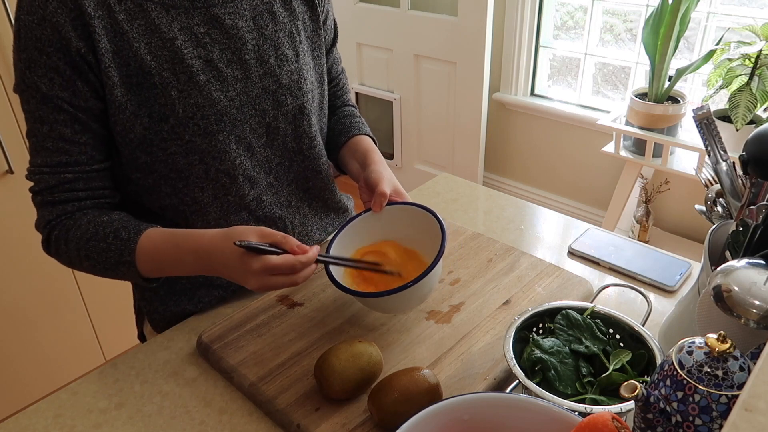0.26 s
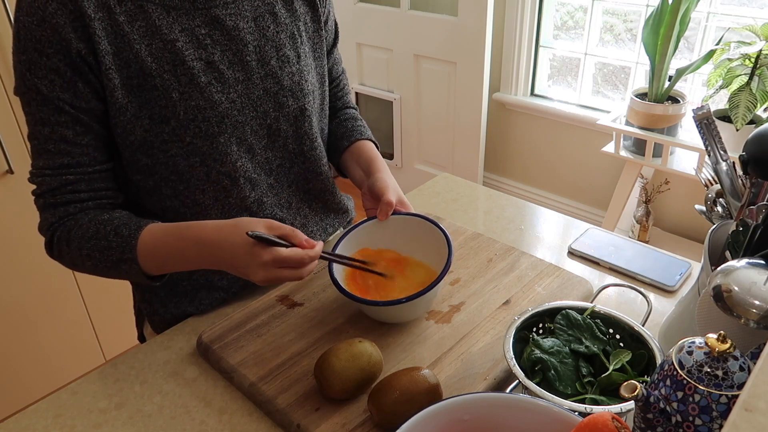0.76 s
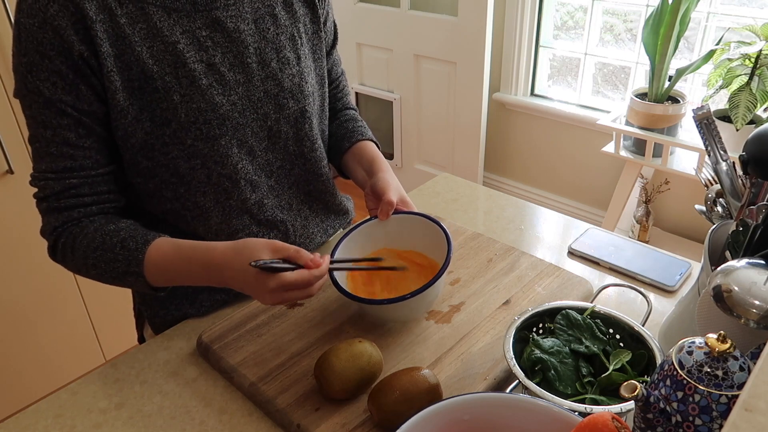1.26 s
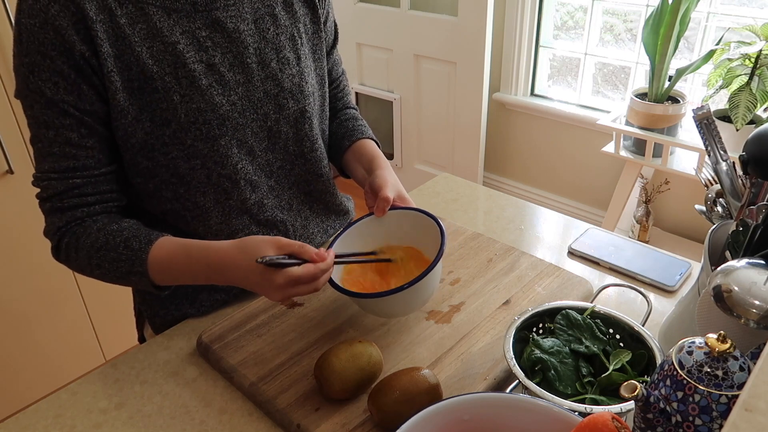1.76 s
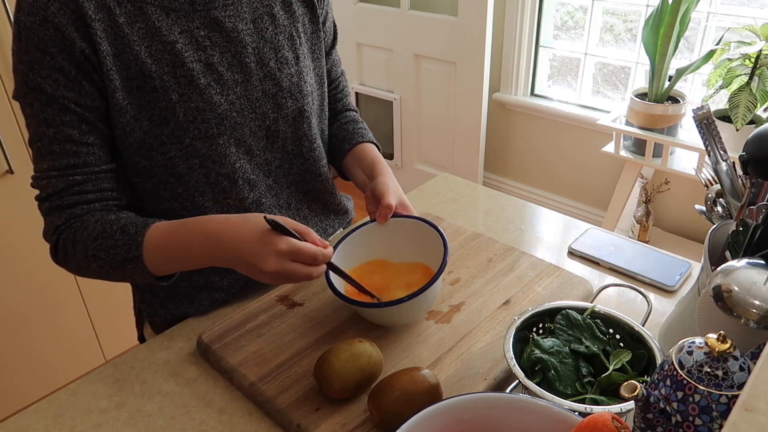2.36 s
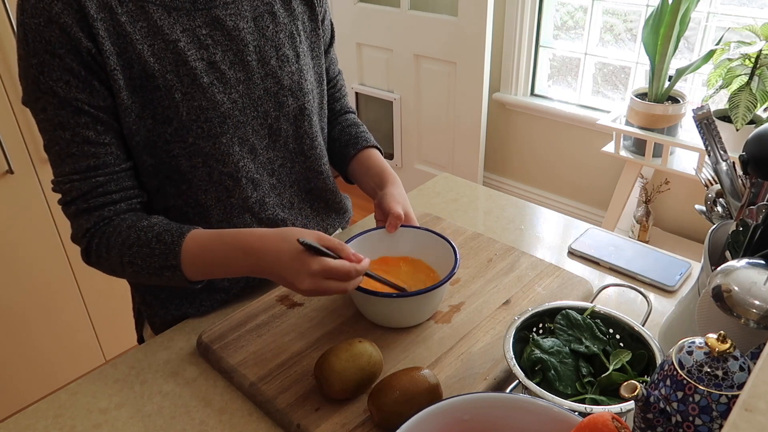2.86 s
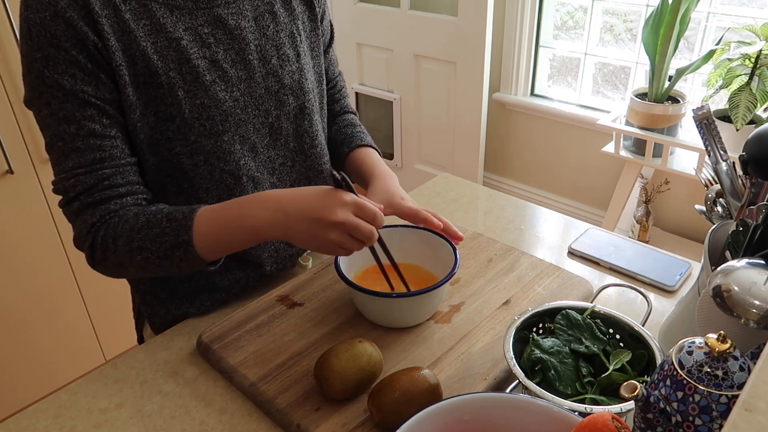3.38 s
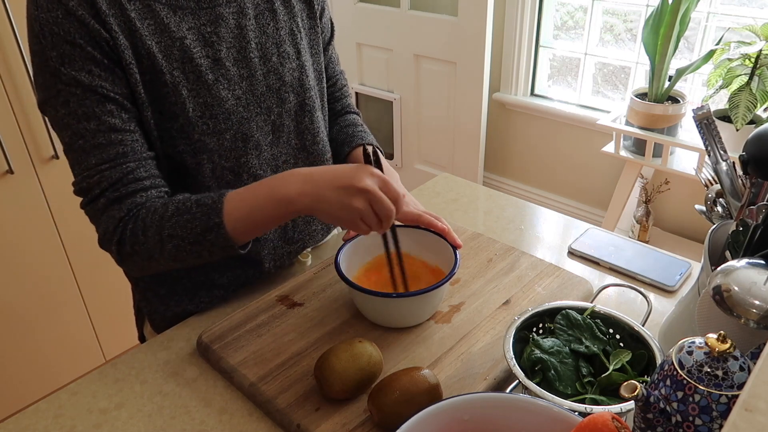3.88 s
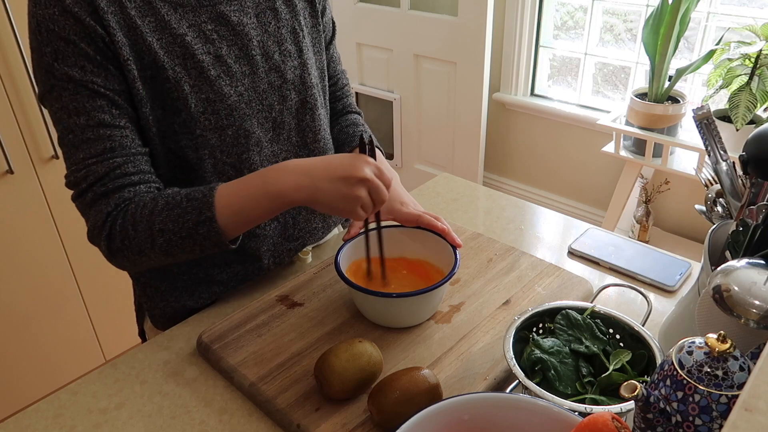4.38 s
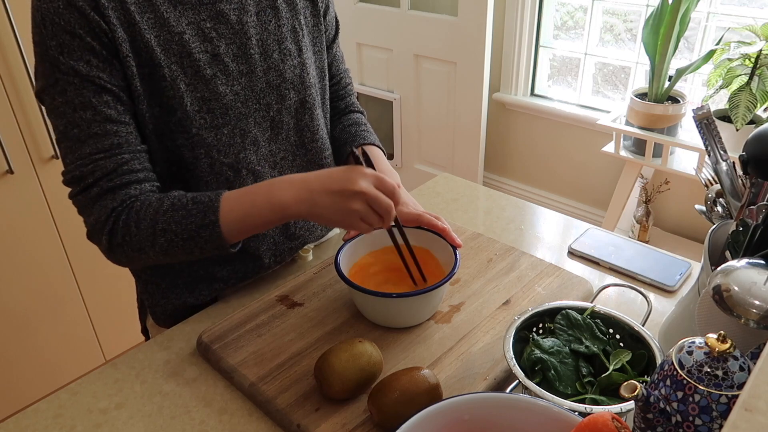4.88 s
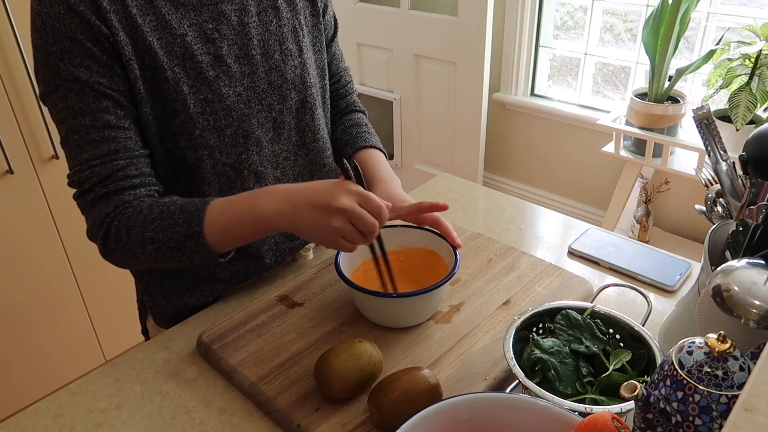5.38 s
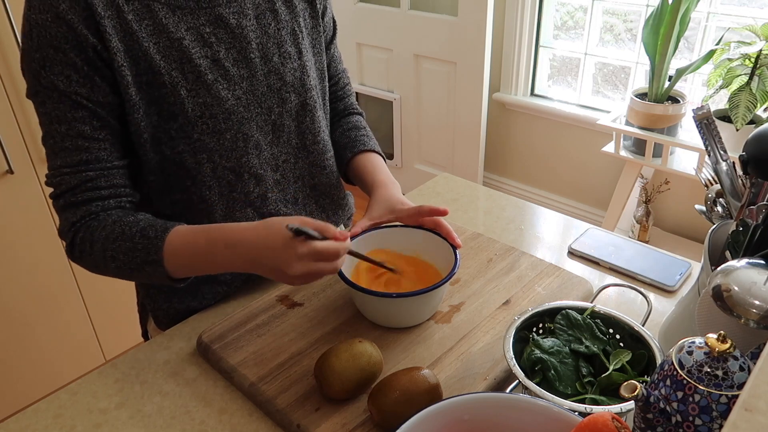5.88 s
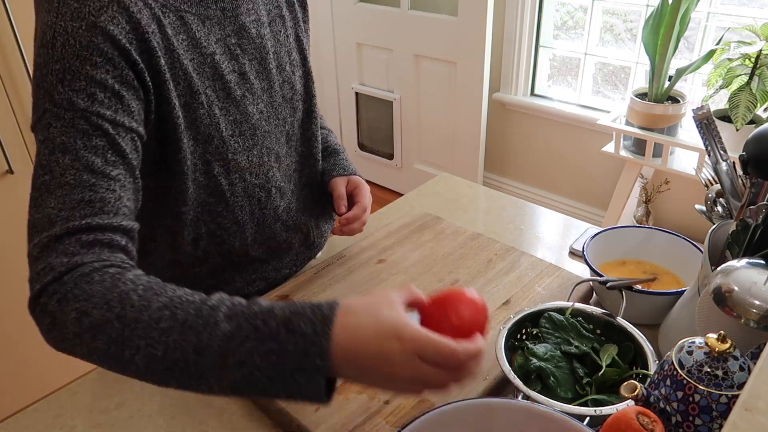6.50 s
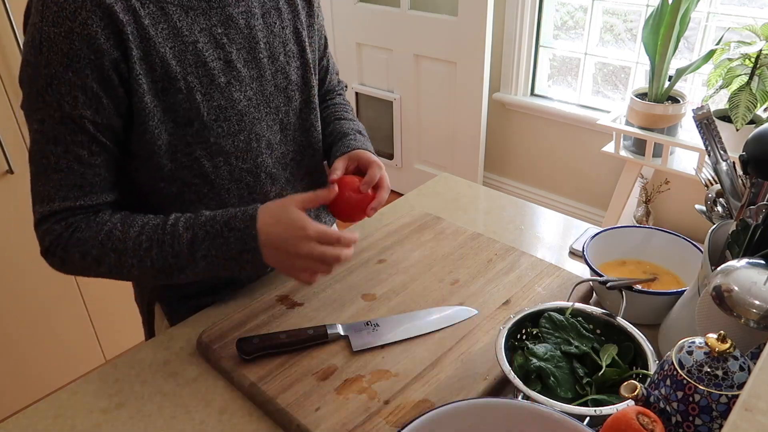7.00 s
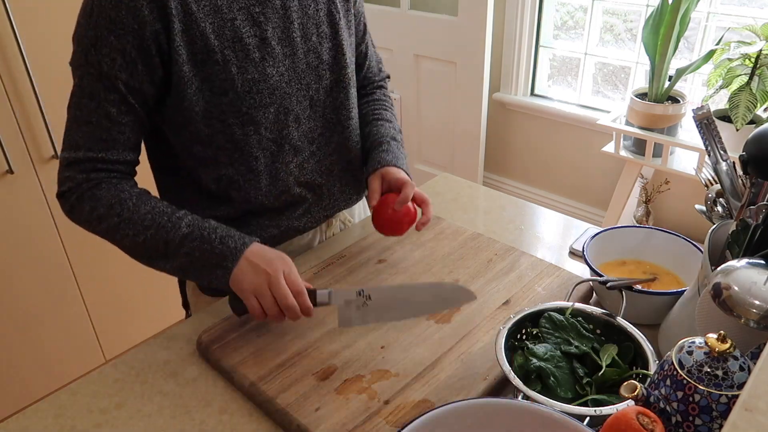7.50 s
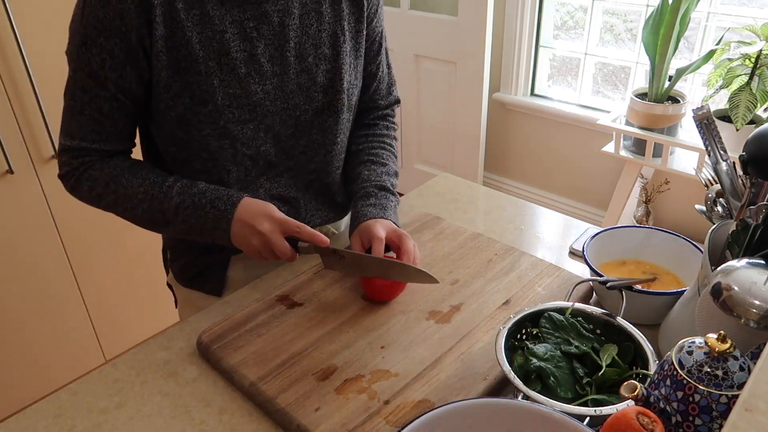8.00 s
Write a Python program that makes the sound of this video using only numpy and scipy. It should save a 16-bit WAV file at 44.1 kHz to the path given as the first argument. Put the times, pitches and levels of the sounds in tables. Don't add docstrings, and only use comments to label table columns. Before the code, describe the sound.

Close stereo pickup of egg beating in a small reverberant kitchen over a low appliance drone. Quick uneven stick clicks and liquid plops come first, then two strong hollow bowl knocks on a board, a smoother wet scraping stir, and bright closing taps. The sound cuts abruptly to near quiet: cloth rustles, a knife lightly bumps wood, and its blade draws softly through a tomato.

```python
import sys
import numpy as np
from scipy import signal
from scipy.fft import rfft, irfft, next_fast_len
from scipy.io import wavfile
from scipy.ndimage import map_coordinates

SR = 44100
rng = np.random.default_rng(int(sys.argv[2]) if len(sys.argv) > 2 else 0)


def attenuation_scalar(level_db):
    decades = np.asarray(level_db, float) / 20
    return 10 ** decades


def master_out(mix):
    frames = np.transpose(np.atleast_2d(mix))
    ceiling = np.clip(frames, -1, 1)
    pcm = np.round(ceiling * 32767).astype(np.int16)
    wavfile.write(sys.argv[1], SR, pcm)


N = 363825
SCENE_CHANGE_S = 6.181

# frequency in Hz, width in Hz, level in dB.
BOWL_MODES = [(962, 210, -3.5), (1130, 250, -7), (1390, 240, -11.5), (1662, 310, -4), (1790, 148, 0.5),
              (2030, 185, -1.5), (2234, 410, -6.5), (2700, 300, -7), (3061, 180, -4), (3566, 240, -15.5),
              (4200, 630, -17.5), (5460, 1320, -18), (5870, 1370, -18), (7880, 760, -34)]
# frequency in Hz, correlation -1 to 1.
COUNTER_LIKENESS = [(60, 0.99), (150, 1), (380, 1), (950, 0.98), (2380, 1), (5980, 0.36), (15000, -0.26)]


def unit(x):
    return x / np.sqrt(np.mean(x ** 2) + 1e-20)


def peak(x):
    return x / np.abs(x).max()


def along(points, hz):
    f, v = np.transpose(points)
    return np.interp(np.log(hz + 1), np.log(f + 1), v)


def curves(rows):
    t = np.arange(0, N / SR + .01, .002)
    power = 0
    for s, db, rise_s, fall_s in rows:
        distance = np.where(t < s, (s - t) / rise_s, (t - s) / fall_s)
        power = power + attenuation_scalar(db - 8.6 * distance) ** 2
    return np.interp(np.arange(N) / SR, t, np.sqrt(power))


def wobble(rate_hz):
    knots = rng.standard_normal(int(N * rate_hz / SR) + 4)
    return map_coordinates(knots, [np.arange(N) * rate_hz / SR])


def filtered(x, response):
    n = x.shape[-1]
    m = next_fast_len(n + min(n, 8192))
    return irfft(rfft(x, m) * response(np.fft.rfftfreq(m, 1 / SR)), m)[..., :n]


def resonant(modes):
    def response(f):
        total = 0
        for k, (hz, width_hz, db) in enumerate(modes):
            damping = 1j * f * width_hz
            total = total + (-1) ** k * attenuation_scalar(db) * damping / (hz * hz - f * f + damping)
        return total
    return response


def spread(pair, likeness):
    def mid_side(hz):
        angle = np.arccos(np.clip(along(likeness, hz), -1, 1)) / 2
        return np.array([np.cos(angle), np.sin(angle)])
    mid, side = filtered(pair, mid_side)
    return np.array([mid + side, mid - side])


def ring(t, hz, t60_s, attack_s=0.00021):
    return np.sin(2 * np.pi * hz * t) * attenuation_scalar(-60 * t / t60_s) * (1 - np.exp(-t / attack_s))


def add(bus, s, sound):
    part = bus[..., round(s * SR):][..., :sound.shape[-1]]
    part += sound[..., :part.shape[-1]]


def spots(count):
    # frequency in Hz, t60 in s.
    decay = [(150, 0.72), (700, 0.51), (2000, 0.54), (4000, 0.49), (6000, 0.5), (12000, 0.22), (16000, .1)]
    # delay in s, level in dB.
    echoes = [(.003, -6.5), (.0055, -8), (.0075, -9.5), (.009, -10), (.012, -12.5), (0.017, -15),
              (.021, -8.5)]
    n = SR // 2
    hz, t, z = signal.stft(rng.standard_normal((count, 2, n)), SR, nperseg=256)
    z = z * attenuation_scalar(-60 * t / along(decay, hz)[:, None])
    tails = signal.istft(z, SR, nperseg=256)[1][..., :n]
    build_up = 1 - np.exp(-np.arange(n) / SR / 0.0022)
    tails = np.array([spread(tail * build_up, COUNTER_LIKENESS) for tail in tails])
    early = np.zeros_like(tails)
    early[..., 0] = 1
    for near in early:
        for delay_s, db in echoes:
            lean = rng.integers(-1, 2)
            at = round(delay_s * rng.uniform(.9, 1.1) * SR) + np.array([lean, -lean])
            near[[0, 1], at] += attenuation_scalar(db) * rng.choice([-1, 1])
    return list(zip(early, tails / np.linalg.norm(tails[:, :1], axis=2, keepdims=True)))


def heard(sound, spot, wet_db):
    early, tail = spot
    return signal.fftconvolve(sound[None], early + attenuation_scalar(wet_db) * tail, axes=1)


def contacts():
    # start in s, ring in dB, hollow tone in Hz, click over ring in dB.
    strikes = [(.086, -30, 1010, -4), (0.267, -34.5, 930, -4.5), (.44, -30.5, 1740, -4.5),
               (.554, -27, 1430, -10.5), (0.611, -26, 1930, -6), (.787, -23.5, 810, -9.5),
               (.946, -25.5, 1025, -8.5), (0.995, -32.5, 1370, -9), (1.116, -25, 1950, -5.5),
               (1.288, -29.5, 1790, -9.5), (1.451, -30, 1880, -7.5), (1.623, -27.5, 1850, -3.5),
               (1.794, -29, 1790, -4), (1.92, -32, 1370, -15), (2.01, -30.5, 1750, -3),
               (2.605, -27, 2690, -12.5), (2.622, -25.5, 2650, -12), (2.973, -37, 1720, -12.5),
               (3.04, -32, 1830, -8.5), (3.124, -27.5, 1490, -5), (3.322, -27, 1713, -8),
               (4.118, -34, 830, -38), (4.38, -35, 1690, -14), (4.568, -33, 2030, -17),
               (4.773, -32, 960, -18), (5, -29, 2030, -3.5), (5.408, -47.5, 940, -0.5),
               (5.621, -46, 2320, -14), (5.879, -25, 1960, -24), (6.0551, -21, 1900, -2)]
    # start in s, ring in dB, click over ring in dB.
    grazes = [(.001, -40.5, -26), (0.506, -41, -4), (0.907, -41.5, -9), (1.952, -33.5, 0.5),
              (2.119, -35.5, -3), (2.303, -37.5, -2.5), (2.786, -38.5, -13), (2.805, -33.5, -10),
              (5.215, -36, -2), (5.317, -35, -40), (5.433, -35.5, -13), (5.638, -33, 6), (5.843, -36, 9),
              (6.122, -40.5, -4)]
    # start in s, peak in dB, hollow tone in Hz, t60 in s.
    plops = [(0.05, -19, 1240, 0.0061), (.224, -22, 1220, 0.029), (0.508, -32, 1130, 0.016),
             (0.716, -40, 1390, .03), (1.077, -36, 2440, 0.028), (1.24, -16.5, 1360, 0.01),
             (2.229, -34, 1214, 0.032), (2.27, -24, 2590, 0.014), (2.303, -23, 3010, .01),
             (2.434, -16.5, 775, 0.036), (2.639, -25, 2570, 0.011), (3.052, -25.5, 1790, 0.034),
             (3.427, -31.5, 1880, 0.016), (3.502, -11, 870, 0.011), (3.588, -36, 1110, .03),
             (3.663, -27, 870, 0.014), (4.008, -18.5, 1800, 0.0089), (4.055, -31, 1750, .013),
             (4.329, -18, 2040, 0.011), (4.537, -19.5, 1920, 0.018), (5.186, -28, 1790, 0.025),
             (5.378, -30.5, 987, 0.039), (5.666, -20, 2010, 0.03), (6.026, -34, 2030, 0.017),
             (6.121, -27, 1910, 0.019)]
    # start in s, peak in dB, tone in Hz, click in dB.
    jolts = [
        (2.3428, -7, 770, -27.5),
        (2.4741, -1, 865, -50.5),
    ]
    touches = [(s, db, hz, 7, 0, click_db, 0.019) for s, db, hz, click_db in strikes]
    touches += [(s, db, 0, 0, 0, click_db, 1) for s, db, click_db in grazes]
    touches += [(s, db, hz, 0, -18, -34.5, t60_s) for s, db, hz, t60_s in plops]
    touches += [(s, db, hz, 0, -58, click_db, 0.0098) for s, db, hz, click_db in jolts]
    return sorted(touches)


def taps(bus, room):
    t = np.arange(SR // 12) / SR
    second_stick_s, second_stick_db = .0065, -4
    tick = attenuation_scalar(-60 * t / 0.009)
    tick = tick + attenuation_scalar(second_stick_db) * np.roll(tick, round(second_stick_s * SR))
    click = resonant([(5850, 3500, -3), (12800, 2600, 0), (15300, 1200, -16)])
    for k, (s, db, hz, tone_db, ring_db, click_db, t60_s) in enumerate(contacts()):
        tone = attenuation_scalar(tone_db) * ring(t, hz, np.clip(t60_s, .004, .2), 0.0003)
        force = 0.23 * rng.standard_normal(len(t)) * attenuation_scalar(-60 * t / 0.023)
        force[3] = 1
        held = []
        for mode_hz, width_hz, level_db in BOWL_MODES:
            cupped = mode_hz < 1300 and 2.55 < s < 3.2
            level_db = level_db + rng.normal(0, 2.6) - 10 * cupped
            held.append((mode_hz * rng.normal(1, 0.011), width_hz, level_db))
        bowl = attenuation_scalar(ring_db + 7.5) * peak(filtered(force, resonant(held)))
        snap = attenuation_scalar(click_db + 9.5) * peak(filtered(rng.standard_normal(len(t)) * tick, click))
        wet_db = .7 if tone_db or not hz else 0
        add(bus, s - .0005, heard(attenuation_scalar(db - 4) * (tone + bowl + snap), room[k % len(room)], wet_db))


def stirring(bus, room):
    # start in s, length in s, rms in dB, scrape pitch in Hz, board level in dB.
    strokes = [(3.57, 0.04, -46, 1800, -5), (3.66, 0.078, -53, 1810, 2), (3.74, 0.057, -50.5, 2080, -6),
               (3.803, 0.055, -42.5, 1250, -5), (3.84, 0.088, -43.5, 1520, -3),
               (3.93, 0.067, -50, 1810, -2), (4.01, 0.032, -49, 1800, 3), (4.04, .05, -42.5, 1780, -3),
               (4.115, 0.1, -49.5, 1860, -0.5), (4.215, 0.14, -40.5, 1850, -4.5),
               (4.33, 0.085, -52.5, 1970, 3.5), (4.435, 0.11, -42, 1950, -5), (4.53, 0.11, -48, 1900, 0),
               (4.65, 0.084, -44.5, 2000, -2.5), (4.75, 0.09, -49, 1890, 0), (4.87, 0.084, -40, 1860, -4.5),
               (4.95, .05, -46.5, 2000, -6), (5.0, 0.12, -51, 1770, -4.5), (5.18, 0.046, -53, 1780, -2),
               (5.31, 0.021, -43.5, 1600, -3.5), (5.37, 0.049, -52, 1780, 0),
               (5.43, 0.038, -46.5, 1800, -4), (5.5, 0.047, -46.5, 1617, -5)]
    u = np.linspace(0, 1, SR // 5)
    board = resonant([(305, 80, -7.0), (940, 260, -5)])
    glaze = resonant([(2700, 500, -9), (3150, 350, -4), (4600, 1200, -13)])
    for k, (s, length_s, db, hz, board_db) in enumerate(strokes):
        slips = rng.random(len(u)) < 700 / SR
        slips = slips * attenuation_scalar(2.5 * np.minimum(rng.exponential(size=len(u)), 3))
        slips = slips * rng.choice([-1, 1], len(u))
        force = unit(slips) + .35 * rng.standard_normal(len(u))
        tip = resonant([(hz, 800, 0)])
        bowl = lambda f: tip(f) ** 2 * (2.8 + resonant(BOWL_MODES)(f)) + glaze(f)
        drag = unit(filtered(force, bowl)) + attenuation_scalar(board_db) * unit(filtered(force, board))
        along_stroke = np.clip(u / 5 / length_s, 0, 1)
        press = np.sin(np.pi * along_stroke ** 0.68) ** 0.67
        add(bus, s, heard(attenuation_scalar(db + .3) * press * drag, room[k % len(room)], wet_db=-2.5))


def stirred_egg(bus, room):
    # start in s, peak in dB, frequency in Hz.
    flecks = [(3.77, -43, 2400), (3.808, -40, 1310), (3.845, -31, 2200), (3.865, -39, 1440),
              (3.88, -32, 1870), (3.912, -38, 1100), (4.032, -33, 1058), (4.06, -33, 2920),
              (4.075, -33, 1180), (4.218, -30, 970), (4.24, -29, 2060), (4.255, -37, 1730),
              (4.265, -39, 4560), (4.285, -28, 1400), (4.453, -32, 2150), (4.49, -36, 2260),
              (4.518, -37, 3100), (4.54, -36, 3090), (4.668, -38, 3050), (4.676, -32, 2280),
              (4.69, -34, 3230), (4.715, -36, 1500), (4.756, -41, 1840), (4.868, -38, 1750),
              (4.887, -29, 2230), (4.9, -29, 1640), (4.916, -32, 1630), (4.928, -30, 1590),
              (4.99, -30, 2070), (5.521, -37, 1583)]
    # peak in s, level in dB, rise in s, fall in s.
    swells = [
        (3.75, -68, .2, .4),
        (4.2, -67, 0.41, 0.46),
        (4.65, -66, .3, .4),
        (5.0, -70, .2, 0.22),
        (5.35, -69, .2, .3),
    ]
    t = np.arange(SR // 20) / SR
    for k, (s, db, hz) in enumerate(flecks):
        climbing_hz = hz * (1 + .03 * t / .01)
        pop = attenuation_scalar(db) * ring(t, climbing_hz, 0.025, 0.00044)
        add(bus, s - .001, heard(pop, room[k % len(room)], wet_db=-6))
    colour = resonant([(6350, 60, -3), (5500, 3000, -3), (8800, 2500, -5), (12200, 3200, 0)])
    hiss = unit(spread(filtered(rng.standard_normal((2, N)), colour), COUNTER_LIKENESS))
    add(bus, 0, curves(swells) * attenuation_scalar(1.2 * wobble(20)) * hiss)


def single_notes(bus, room):
    # start in s, peak in dB, frequency in Hz, t60 in s, climb as a share of frequency.
    rings = [(.049, -37.5, 1132, 0.28, -0.031), (.439, -19, 1010, 0.0068, 0.049),
             (.554, -24, 1310, 0.073, 0.11), (.566, -16, 1816, 0.012, 0.064),
             (1.696, -18, 972, 0.17, -0.0064), (1.697, -20, 1022, 0.1, 0.037),
             (2.606, -37.5, 2690, 0.19, 0.0041), (2.607, -31, 3402, 0.13, 0.0076),
             (2.606, -29, 4360, 0.014, 0.072), (2.608, -39.5, 4732, 0.15, 0),
             (2.81, -41.5, 3320, 0.058, 0.0051), (5.879, -26.5, 1130, 0.1, -0.053),
             (6.056, -9, 3080, 0.014, -0.041), (6.121, -9, 3160, 0.0055, -0.17),
             (7.775, -38.5, 2880, 0.035, -0.0098), (7.79, -46, 3100, 0.074, -0.01),
             (7.83, -50, 2620, .05, -0.062), (7.865, -51, 3200, .04, -0.011),
             (2.607, -44, 3941, .25, 0.021), (2.607, -40, 4296, 0.16, 0.025), (2.606, -49, 7294, 0.18, 0),
             (2.606, -53, 8170, 0.12, 0.0097), (2.605, -42.5, 9200, .05, -0.026),
             (2.64, -39, 3402, .1, 0.0071), (6.046, -22, 1840, .03, 0), (6.057, -31, 2550, 0.12, 0),
             (6.058, -22, 1600, 0.11, -0.038), (6.135, -30, 1800, .04, 0.01),
             (2.344, -16, 2150, 0.017, 0.013), (2.36, -32, 1560, 0.16, -0.02), (7.288, -37, 900, .1, 0),
             (7.29, -39, 445, .1, 0), (2.66, -40, 2660, .3, 0), (1.452, -38, 3000, .06, 0),
             (1.452, -38, 1030, .12, 0), (5.447, -36, 980, .1, 0), (5.668, -33, 3050, .06, 0),
             (5.217, -33, 300, .04, 0), (1.795, -31, 1790, .12, 0), (.611, -28, 1850, .05, 0),
             (3.125, -33, 3150, .05, 0)]
    t = np.arange(SR // 4) / SR
    for k, (s, db, hz, t60_s, climb) in enumerate(rings):
        climbing_hz = hz * (1 + climb * np.minimum(t, .05) / 0.0184)
        note = attenuation_scalar(db) * ring(t, climbing_hz, t60_s, 0.00034)[:round(t60_s * SR)]
        add(bus, s - .0005, heard(note, room[k % len(room)], wet_db=-6.5))


def knocks(bus, room):
    # start in s, peak in dB, blow in Hz, thud in dB, edge in dB.
    blows = [(0.754, -24, 690, -2.5, -22), (1.13, -12, 721, -18, -13), (2.343, -9, 721, -23, -15.5),
             (2.475, -10, 725, -19, -10.5), (2.833, -30, 720, -4, -14), (3.321, -38, 790, -3, -12),
             (5.001, -40, 354, 2, -8), (5.214, -41, 360, -14, -21), (5.665, -37.5, 964, 0.5, -0.5),
             (5.879, -31, 857, -4, -18), (6.058, -27, 602, 1.5, -3.5), (7.287, -31, 690, 2, -16),
             (7.318, -37, 675, 2, -30), (7.476, -48, 680, -21, -13)]
    # frequency in Hz, level in dB, t60 in s.
    board_modes = [(696, -2, 0.4), (403.6, -1.5, 0.25), (588, -11, 0.3), (721, 3.5, 0.93), (790, 0, 0.45),
                   (450, -9, 0.35), (1021, -6, 1.8), (1121, -6, .5), (1233, 0, 0.2)]
    t = np.arange(SR // 2) / SR
    thud = ring(t, 283, 0.032, 0.002) + ring(t, 413, 0.024, 0.00026)
    edge_tones = ring(t, 1900, 0.024) + ring(t, 1395, 0.0087) + ring(t, 1114, 0.044)
    for k, (s, db, hz, thud_db, edge_db) in enumerate(blows):
        board_db = -19.5 if s < SCENE_CHANGE_S else -38
        clatter = rng.standard_normal(len(t)) * attenuation_scalar(-60 * t / 0.061)
        clatter = filtered(clatter, resonant([(1480, 290, 0)]))
        edge = edge_tones + 0.82 * peak(clatter)
        blow = ring(t, hz, 0.036, 0.00012) + attenuation_scalar(thud_db) * thud + attenuation_scalar(edge_db) * edge
        blow = filtered(blow, lambda f: 1 / (1 + 1j * f / 3000) ** 2)
        board = 0
        for mode_hz, level_db, t60_s in board_modes:
            level = attenuation_scalar(level_db + rng.normal(0, 0.96))
            board = board + level * ring(t, mode_hz, min(t60_s, .55), 0.0017)
        arriving = heard(blow, room[k], wet_db=-1)[:, :len(t)]
        add(bus, s - .0005, attenuation_scalar(db + 6.0) * (arriving + attenuation_scalar(board_db) * board))


def rustle():
    # peak in s, level in dB, rise in s, fall in s.
    slides = [
        (6.88, -51.5, 0.3, 0.23),
        (7.28, -41, 0.005, 0.024),
        (7.51, -54, 0.012, 0.16),
    ]
    slices = [
        (7.78, -49.5, 0.013, 0.14),
        (7.93, -47, 0.13, 0.049),
    ]
    # frequency in Hz, density in dB per Hz.
    cloth_colour = [(50, 0), (150, 12), (700, 5), (3180, -11.5), (10600, -47), (12000, -49), (15600, -67),
                    (22000, -120)]
    blade_colour = [(300, 9.5), (900, 2.5), (3000, -1.5), (5000, -13), (10000, -24), (15600, -45)]

    def friction(colour):
        noise = filtered(rng.standard_normal((2, N)), lambda hz: attenuation_scalar(along(colour, hz)))
        return unit(spread(noise, COUNTER_LIKENESS))
    cloth, blade = friction(cloth_colour), friction(blade_colour)
    never_still = attenuation_scalar(-62) * (np.arange(N) > SCENE_CHANGE_S * SR)
    sleeve = curves(slides) + never_still
    return attenuation_scalar(1.5 + wobble(30)) * (sleeve * cloth + curves(slices) * blade)


def kitchen_air():
    # frequency in Hz, density in dB per Hz.
    air_colour = [(13, -28), (22, -5), (397, -7), (686, -17), (3340, -23.5), (9500, -34.5), (12000, -43),
                  (14000, -52), (16000, -68)]
    # frequency in Hz, correlation -1 to 1.
    air_likeness = [(60, 1), (130, 0.88), (290, 0.53), (640, 0.012), (1410, 0.22), (3100, 0.22),
                    (6820, -0.46), (15000, -0.57)]
    # frequency in Hz, width in Hz, level in dB.
    drones = [(46.4, 29, -5.5), (100.8, 6.2, 1), (140.5, 6.3, -7), (242, 9.1, -1.5), (970, 10, -12.5),
              (3360, 65, -17), (3420, 60, -14)]
    # peak in s, level in dB, rise in s, fall in s.
    hum_swells = [(0.0, -57, .1, 0.25), (2.75, -68, 0.067, 0.4), (3.72, -56, 0.12, 0.2),
                  (3.95, -56, .15, .15), (4.2, -55, 0.15, 0.15), (5.39, -54, 0.05, 0.07),
                  (5.48, -57, .03, .03), (5.6, -56, .04, .08), (6.22, -57, 0.2, 0.23),
                  (6.78, -67, .15, 0.48), (7.6, -56, 0.12, 0.2), (8.2, -55, 0.1, .1)]
    air_db = -50.5
    air = filtered(rng.standard_normal((2, N)), lambda hz: attenuation_scalar(along(air_colour, hz)))
    drone = filtered(rng.standard_normal((2, N)), resonant(drones))
    phase = 2 * np.pi * np.cumsum(396 + 6 * wobble(11)) / SR
    tone = curves(hum_swells) * attenuation_scalar(9 + 2.5 * wobble(14)) * np.sin(phase)
    air = attenuation_scalar(air_db) * unit(spread(air, air_likeness))
    drone = attenuation_scalar(air_db - 2.5) * unit(spread(drone, COUNTER_LIKENESS))
    return air + drone + tone


def scene():
    room, counter = spots(count=14), np.zeros((2, N))
    background = kitchen_air() + rustle()
    for source in (taps, stirring, stirred_egg, single_notes, knocks):
        source(counter, room)
    t = np.arange(N) / SR
    shown = np.clip((SCENE_CHANGE_S - t) / 0.0022, 0, 1) + (t > SCENE_CHANGE_S + .9)
    counter = filtered(counter, lambda f: (1j * f / (130 + 1j * f)) ** 2)
    return counter * shown + background


def thinned(x):
    # frequency in Hz, level below which a band falls silent, re whole treble in dB.
    silent_below = [(7000, -45), (8300, -27), (9500, -25.5), (11000, -27.5), (12500, -32), (14000, -33),
                    (15000, -32), (16500, -36)]
    mid_side = np.array([x[0] + x[1], x[0] - x[1]]) / 2
    hz, _, z = signal.stft(mid_side, SR, nperseg=2048)
    power = np.abs(z) ** 2
    band = power[:, :-1].reshape(2, -1, 16, z.shape[-1]).sum(axis=2)
    band_hz = hz[8::16, None]
    treble = power[:, hz > 3000].sum(axis=1, keepdims=True)
    limit = attenuation_scalar(along(silent_below, band_hz) + 3 * rng.standard_normal(band.shape)) ** 2
    keep = (band > limit * treble) | (band_hz < 7000)
    z[:, :-1] *= np.repeat(keep, 16, axis=1)
    mid, side = signal.istft(z, SR, nperseg=2048)[1][:, :N]
    return np.array([mid + side, mid - side])


def top_cut(x):
    return signal.sosfilt(signal.butter(12, 16670, fs=SR, output="sos"), x)


def record(dry):
    # frequency in Hz, gain in dB.
    mic_gain = [(20, -9.5), (60, -3.5), (150, -1.5), (12500, 3.5), (14500, -2), (15800, 1), (16400, -8),
                (17000, -54)]
    mix = thinned(filtered(dry, lambda hz: attenuation_scalar(along(mic_gain, hz))))
    return top_cut(mix)


dry = scene()
out = record(dry)
master_out(out)
```